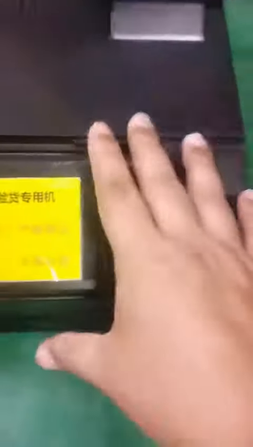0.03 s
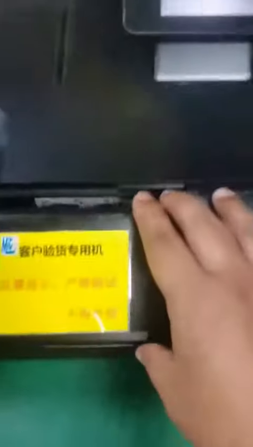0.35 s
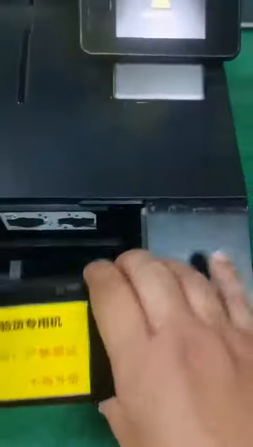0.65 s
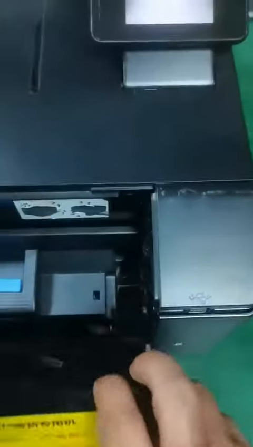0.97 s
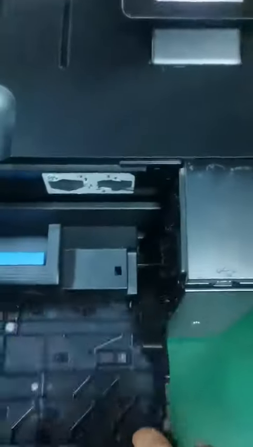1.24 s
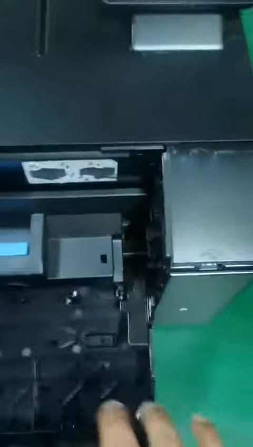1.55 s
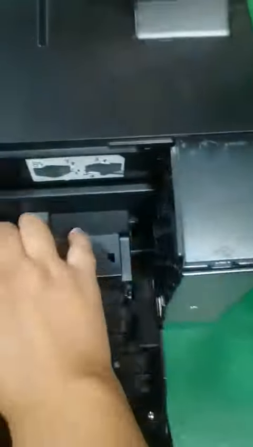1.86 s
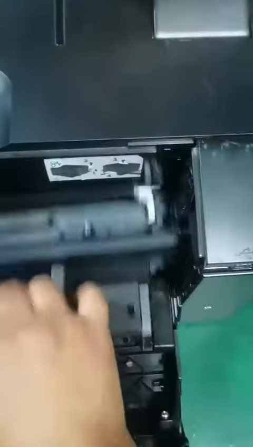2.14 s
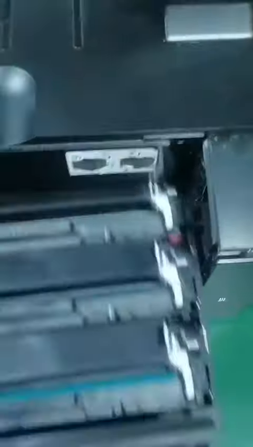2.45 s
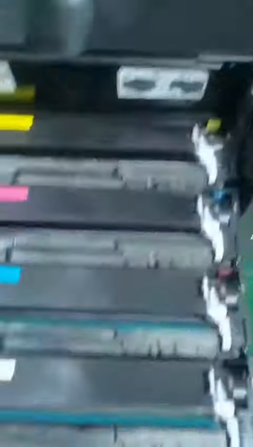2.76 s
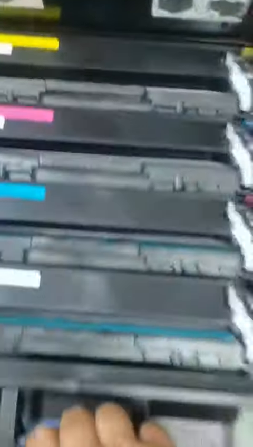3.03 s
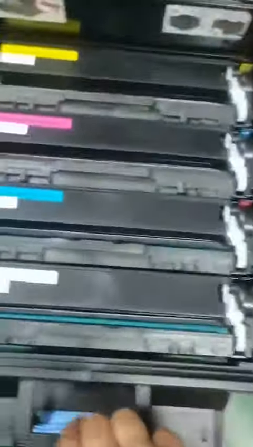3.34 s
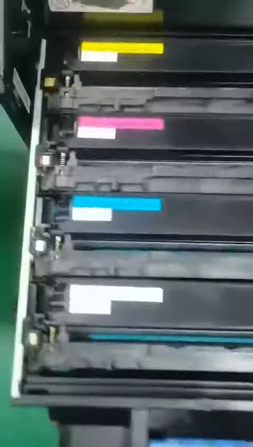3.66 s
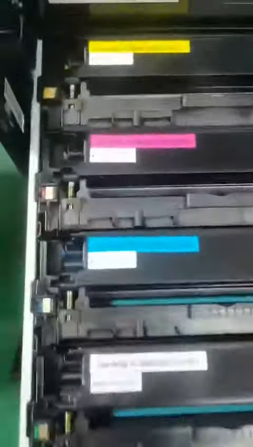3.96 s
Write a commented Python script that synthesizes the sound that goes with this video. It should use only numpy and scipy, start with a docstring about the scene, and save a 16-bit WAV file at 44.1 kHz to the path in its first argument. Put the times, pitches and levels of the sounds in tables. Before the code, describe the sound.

Hollow plastic clunks and clatters come from a printer, close by in a quiet room. After a faint finger rub, the cover knocks open at 0.5 seconds, squeals briefly around 0.8 amid dull microphone bumps, then drops and rattles until 1.7. A catch snaps near 1.9 and the toner drawer bumps along its rails until 2.8. After a lull, the cartridges clatter at 3.4 seconds.

```python
"""A quiet room, close to a printer: a hand swings down the plastic front cover, pulls the toner drawer.
The hinge sticks and slips in a squeal; the cover drops and rattles. The drawer bumps along its rails
and the cartridges clatter at its stop, each knock ringing the hollow housing. Fingers rub, catches
snap, handling thuds reach the microphone. A noise suppressor turns down the tails and the gaps."""
import sys
import numpy as np
from scipy import signal
from scipy.fft import rfft, irfft
from scipy.io import wavfile
from scipy.ndimage import uniform_filter1d, minimum_filter1d

SR = 44100
rng = np.random.default_rng(int(sys.argv[2]) if len(sys.argv) > 2 else 0)


def inscribe(sig):
    """Save sig as 16-bit PCM at rate SR to the path in sys.argv[1].

    A 1-D sig is mono; a 2-D sig holds one channel per row.
    Samples are clipped to [-1, 1] before scaling.
    """
    pcm = np.round(np.clip(np.atleast_2d(sig).T, -1, 1) * 32767)
    wavfile.write(sys.argv[1], SR, pcm.astype(np.int16))


N = 176400
TIME = np.arange(N) / SR


def from_db(db):
    """Decibels to gain."""
    return 10 ** (np.asarray(db) / 20)


def unit_rms(x):
    """Scale to RMS 1."""
    return x / np.sqrt(np.mean(x ** 2) + 1e-20)


def at_hz(points, hz):
    """Spectrum table interpolated in log frequency."""
    points_hz, db = np.transpose(points)
    return np.interp(np.log(hz + 1), np.log(points_hz), db)


def bins_hz(size):
    """FFT bin frequencies."""
    return np.arange(size // 2 + 1) * SR / size


def coloured(x, curve_db):
    """Minimum-phase filter; white noise keeps its power."""
    cepstrum = irfft(np.log(unit_rms(from_db(curve_db))))
    cepstrum[1:len(x) // 2] *= 2
    cepstrum[len(x) // 2 + 1:] = 0
    return irfft(rfft(x) * np.exp(rfft(cepstrum)))


def drift(rate_hz):
    """Smooth random wander, RMS 1."""
    return unit_rms(irfft(rfft(rng.standard_normal(N)) / (1 + (bins_hz(N) / rate_hz) ** 2) ** 2))


def add(out, start_s, x):
    """Mix x in at start_s."""
    i = int(start_s * SR)
    out[i:i + len(x)] += x[:N - i]


def swell(start_s, length_s):
    """Rounded rise and fall."""
    return np.sin(np.pi * np.clip((TIME - start_s) / length_s, 0, 1)).clip(0) ** 0.63


def resonance_db(hz, centre_hz, width_hz, lift_db):
    """Bell curve of one mode."""
    return lift_db / (1 + (2 * (hz - centre_hz) / width_hz) ** 2)


# Air spectrum (frequency [Hz], relative density [dB])
AIR_SPECTRUM = [(120, -3.5), (260, -7), (400, -13.5), (2000, -18), (4000, -25.5), (14000, -40.5)]
# Air envelope (time [s], level [dB])
AIR_ENVELOPE = [(1.3, -70.5), (1.8, -76.5)]


def room_air():
    """Faint, dark room noise."""
    level_db = np.interp(TIME, *np.transpose(AIR_ENVELOPE))
    return from_db(level_db) * coloured(rng.standard_normal(N), at_hz(AIR_SPECTRUM, bins_hz(N)))


# Thud spectrum (frequency [Hz], relative density [dB])
THUD_SPECTRUM = [(20, -10.5), (44, 1.5), (62, -4.5), (170, -3.5), (260, -8.5), (350, -20), (1500, -27.5),
                 (9000, -92)]
# Bumps on the microphone (time [s], length [s], level [dB])
HANDLING_THUDS = [(0.488, 0.027, -31.5), (0.515, 0.2, -45.5), (0.68, 0.048, -34.5), (0.741, 0.12, -35.5),
                  (0.864, 0.054, -26.5), (0.924, 0.046, -27.5), (0.963, 0.021, -23), (0.981, 0.069, -29.5),
                  (1.066, 0.037, -35.5), (1.135, 0.046, -38.5), (2.445, 0.024, -42.5),
                  (2.691, 0.033, -44.5), (2.828, 0.024, -50), (3.018, 0.02, -49), (3.09, 0.038, -47.5),
                  (3.269, 0.03, -50.5), (3.807, 0.074, -36.5), (3.958, 0.041, -39.5)]


def handling_thuds():
    """The hand holding the microphone shifts: dull bumps."""
    force = sum(from_db(db) * swell(start_s, length_s) for start_s, length_s, db in HANDLING_THUDS)
    return force * coloured(rng.standard_normal(N), at_hz(THUD_SPECTRUM, bins_hz(N)))


# Rub spectrum (frequency [Hz], relative density [dB])
RUB_SPECTRUM = [(400, -18), (1600, 5), (2800, -12), (3600, 1), (4700, -22.5), (5700, -15), (6800, -29),
                (8000, -45)]
# Finger strokes (time [s], length [s], level [dB])
FINGER_RUBS = [(0.01, 0.11, -37), (0.451, 0.098, -45)]


def finger_rubs(grain_db=3.5):
    """Fingers drag over the textured cover: grainy hiss."""
    force = sum(from_db(db) * swell(start_s, length_s) for start_s, length_s, db in FINGER_RUBS)
    force *= from_db(grain_db * drift(rate_hz=80))
    return coloured(force * rng.standard_normal(N), at_hz(RUB_SPECTRUM, bins_hz(N)))


# Struck plastic, taps and knocks (frequency [Hz], relative density [dB])
PLASTIC_SPECTRUM = [(30, -31.5), (100, -31.5), (200, -16.5), (330, -19), (500, -5), (700, -0.5), (1000, 0),
                    (1200, -3), (1500, -0.5), (2200, -2.5), (2700, -4), (3200, -15), (4000, -26.5),
                    (5000, -44), (7000, -52.5), (9000, -75.5)]
# Loose parts (time [s], ring [Hz], level [dB])
SETTLING_TAPS = [(1.711, 1335, -34), (1.742, 804, -37.5), (1.846, 1240, -30.5), (2.503, 563, -35.5),
                 (2.563, 882, -43.5)]


def settling_taps(rise_s=0.006, ring_db=21, size=8192):
    """Loose parts settle: dull taps, each around one pitch."""
    out, t, hz = np.zeros(N), np.arange(size) / SR, bins_hz(size)
    for start_s, ring_hz, db in SETTLING_TAPS:
        touch = rng.standard_normal(size) * (t / rise_s) * np.exp(1 - t / rise_s)
        colour_db = at_hz(PLASTIC_SPECTRUM, hz) + resonance_db(hz, ring_hz, ring_hz / 2, ring_db)
        add(out, start_s, from_db(db) * coloured(touch, colour_db))
    return out


# Tick spectrum (frequency [Hz], relative density [dB])
TICK_SPECTRUM = [(1500, -28), (3800, 9.5), (7000, -1), (9000, -22), (14000, -30)]
# Catch snaps (time [s], level [dB])
CATCH_TICKS = [(.521, -36.5), (1.037, -49.5), (1.32, -34.5), (1.875, -19.5), (2.244, -48), (2.675, -42),
               (3.419, -37.5)]


def catch_ticks(decay_s=0.0022, size=4096):
    """Catches snap: short, bright bursts."""
    out, t = np.zeros(N), np.arange(size) / SR
    for start_s, db in CATCH_TICKS:
        burst = rng.standard_normal(size) * np.exp(-t / decay_s)
        add(out, start_s, from_db(db) * coloured(burst, at_hz(TICK_SPECTRUM, bins_hz(size))))
    return out


def stick_slip(wander=0.0033, flutter_db=1.0, rasp_depth=0.29, rasp_hz=454):
    """Plastic sticks and slips, jittering a tone's pitch, amplitude and phase."""
    pitch_ratio = 1 + wander * drift(rate_hz=120)
    flutter = from_db(flutter_db * drift(rate_hz=220))
    rasp = 1 + rasp_depth * (drift(rasp_hz) + 1j * drift(rasp_hz))
    return pitch_ratio, np.sqrt(2) * flutter * np.abs(rasp), np.angle(rasp)


# Short squeaks (time [s], length [s], pitch [Hz], level [dB])
RASPY_SQUEAKS = [(0.017, 0.021, 3440, -45), (0.052, 0.021, 2370, -29.5), (0.117, 0.05, 2070, -41),
                 (0.147, 0.0081, 2020, -50), (0.462, 0.028, 2215, -21), (0.476, 0.048, 2250, -17.5),
                 (1.85, .011, 2090, -22), (2.84, 0.052, 2012, -45), (3.372, 0.02, 2104, -30.5),
                 (3.555, 0.067, 2178, -41.5), (3.657, 0.046, 2122, -51)]


def raspy_squeaks(pitch_ratio, amplitude, slip_rad):
    """Brief, raspy tones: plastic parts rub, and late on a buzz sounds near the latch."""
    out = np.zeros(N)
    rad_per_hz = 2 * np.pi * np.cumsum(pitch_ratio) / SR
    for start_s, length_s, hz, db in RASPY_SQUEAKS:
        out += from_db(db) * swell(start_s, length_s) * np.sin(hz * rad_per_hz + slip_rad)
    return amplitude * out


# Hinge contour (time [s], pitch [Hz], fundamental [dB], 2nd harmonic [dB], 3rd harmonic [dB])
HINGE_SQUEAL = [(0.739, 1018, -52, -21, -78.5), (0.763, 1057, -16.5, -21, -88),
                (0.783, 1110, -25.5, -16, -44.5), (0.8, 1095, -33, -27.5, -54),
                (0.816, 1110, -20, -18, -37.5), (0.831, 1079, -37, -33.5, -43),
                (0.841, 1096, -57, -18.5, -28), (.856, 1089, -36.5, -34, -38.5),
                (.877, 1080, -62, -25, -67.5), (0.894, 1116, -30.5, -47, -103),
                (0.912, 1120, -42, -49, -82)]


def hinge_squeal(pitch_ratio, amplitude, slip_rad, fade_s=0.004):
    """Hinge friction: one wavering squeal of three harmonics."""
    out = np.zeros(N)
    times_s, hz, *harmonics_db = np.transpose(HINGE_SQUEAL)
    phase = 2 * np.pi * np.cumsum(np.interp(TIME, times_s, hz) * pitch_ratio) / SR
    gate = np.clip(np.minimum(TIME - times_s[0], times_s[-1] - TIME) / fade_s, 0, 1)
    for k, db in enumerate(harmonics_db, 1):
        out += from_db(np.interp(TIME, times_s, db)) * np.sin(k * phase + slip_rad)
    return gate * amplitude * out


def panel_modes_db(t, ring_s=0.016, ripple_db=2.5):
    """Close, narrow panel modes ripple the spectrum."""
    response = rng.standard_normal(len(t)) * np.exp(-t / ring_s)
    return ripple_db * unit_rms(rfft(response).real)


def clatter(t, length_s, colour_db, contacts_per_s=350, contact_share=0.28):
    """Loose parts chatter: contacts in noise, sagging over length_s, dulling, then dying."""
    attack_s, sag_db, release_t60_s = 0.00085, 11.5, 0.13
    dulling_s, dull_hz = 0.14, 4270
    size = len(t)
    hits = rng.random(size) < contacts_per_s / SR
    contacts = unit_rms(hits * rng.choice([-1, 1], size) * rng.uniform(0.32, 1, size))
    chatter = np.sqrt(contact_share) * contacts + np.sqrt(1 - contact_share) * rng.standard_normal(size)
    fall_db = -sag_db * np.minimum(t / length_s, 1) - 60 * np.maximum(t - length_s, 0) / release_t60_s
    chatter *= from_db(fall_db) * (1 - np.exp(-t / attack_s))
    bright = np.exp(-t / dulling_s)
    dull_db = colour_db - 10 * np.log10(1 + (bins_hz(size) / dull_hz) ** 8)
    return coloured(chatter * bright, colour_db) + coloured(chatter * (1 - bright), dull_db)


def impact(t, ring_hz, colour_db, contact_s=0.004, ring_weight=1.4):
    """Hard contact: a crack plus the main ring."""
    contact = np.exp(-t / contact_s)
    crack = unit_rms(coloured(rng.standard_normal(len(t)) * contact, colour_db))
    ring = unit_rms(np.sin(2 * np.pi * ring_hz * t) * contact * (1 - contact))
    return unit_rms(crack + ring_weight * ring) * np.sqrt(np.mean(contact ** 2))


# Housing resonances (centre [Hz], width [Hz], lift [dB])
HOUSING_MODES = [(252, 77, 8.5), (382, 51, 5), (480, 92, 3), (843, 21, -4), (1467, 48, 3), (1880, 60, 2),
                 (2214, 240, 3)]


def knocks(table, onset_swell_s=0.0047, onset_swell_db=-10, size=24576):
    """Knocks with a soft onset strike and clatter in the hollow housing."""
    bass_hz, mid_hz, body_hz, treble_hz = 314, 760, 2050, 3700
    strike_db, impact_gain = 4.5, 1.64
    out, t, hz = np.zeros(N), np.arange(size) / SR, bins_hz(size)
    centre_s = size / SR / 2
    housing_db = at_hz(PLASTIC_SPECTRUM, hz) + sum(resonance_db(hz, *mode) for mode in HOUSING_MODES)
    for start_s, db, length_s, impact_db, bass_db, mid_db, treble_db, ring_hz, ring_db in table:
        tone = [(bass_hz / 2, min(bass_db, 0)), (bass_hz, bass_db), (mid_hz, mid_db),
                (body_hz, 0), (treble_hz, treble_db)]
        colour_db = housing_db + at_hz(tone, hz) + panel_modes_db(t)
        colour_db += resonance_db(hz, ring_hz, 0.2 * ring_hz, ring_db)
        strike = clatter(t, length_s, colour_db)
        strike += impact_gain * from_db(impact_db) * impact(t, ring_hz, colour_db)
        onset_swell = rng.standard_normal(size) * np.exp(-np.abs(t - centre_s) / onset_swell_s)
        add(out, start_s - centre_s, from_db(db + onset_swell_db) * coloured(onset_swell, colour_db))
        add(out, start_s, from_db(db + strike_db) * strike)
    return out


# Cover knocks (time [s], base level [dB], clatter length [s], impact trim [dB],
# bass [dB], mid [dB], treble [dB], ring [Hz], ring lift [dB])
COVER_HITS = [ (0.517, -19.5, 0.074, 5.5, -5.5, 11, 8, 874, -0.5),
              (0.600, -17, 0.051, -2.5, -25.5, -11, -6.5, 862, 4.5),
              (0.652, -22, 0.13, -13, -31, -3.5, -4, 1725, 8),
              (1.026, -16, 0.044, -25.5, -56, 9, 0, 1096, 6.5),
              (1.045, -16.5, 0.04, -1.5, -18, 0, -2.5, 1093, 4),
              (1.3175, -19.5, 0.23, 5.5, 0.5, 5.5, 3, 650, 0),
              (1.378, -21.5, 0.096, -1, 10, 0.5, 8, 1720, 3), (1.414, -25, 0.19, 4.5, -6, 9, 7, 880, 3.5),
              (1.463, -20, 0.14, -11.5, -4, 8.5, -3.5, 2030, 8.5),
              (1.496, -22.5, 0.14, 4, -9.5, 2.5, -8, 650, 2.5),
              (1.586, -15.5, 0.032, -4.5, -14.5, 6.5, -10, 1415, 3.5),
              (1.664, -27.5, 0.052, -7, -7, 2, -3, 1640, 6.5)]


def front_cover():
    """The cover swings down, drops and rattles."""
    return knocks(COVER_HITS)


# Drawer and cartridge knocks (columns as COVER_HITS)
DRAWER_HITS = [ (1.875, -21.5, 0.29, 10.5, -5, -6, 1.5, 1399, 2.8),
               (1.915, -25, 0.18, -5.5, -17.5, -16.5, 13, 2555, 15),
               (1.995, -17, 0.092, -6, 6, 3.5, -14, 361, 13),
               (2.111, -17.5, 0.077, -6, -6.5, 1, -16, 410, 4.3),
               (2.140, -18.5, 0.1, -3, 19, 4, -3.5, 249, 3.8),
               (2.243, -16.5, 0.074, -6.5, 11, 9, -4, 407, 7.4),
               (2.392, -17.5, 0.069, -27, 9.5, 6.5, 0, 860, 5.6),
               (2.424, -22.5, 0.034, -8, 18, -1.5, -15, 199.6, 19),
               (2.668, -19.5, 0.099, 9, -3.5, 3.5, 9.5, 1632, 7.9),
               (2.695, -19.5, 0.1, -2.5, -9, 0, -7, 716, 3.45),
               (3.419, -16.5, 0.027, 2, -4.5, 4, 6, 1935, 3.4),
               (3.430, -20, 0.13, 2, -26, -16.5, 4, 2440, 5.6)]


def toner_drawer():
    """The drawer bumps along its rails; cartridges clatter at its stop."""
    return knocks(DRAWER_HITS)


def scene():
    """Impacts, friction and handling, mono."""
    impacts = front_cover() + toner_drawer() + settling_taps() + catch_ticks()
    friction = stick_slip()
    squeaks = raspy_squeaks(*friction) + hinge_squeal(*friction)
    return (impacts + squeaks + finger_rubs() + handling_thuds())[None]


# Suppressor threshold (frequency [Hz], density [dB/Hz])
SUPPRESSOR_THRESHOLD = [(100, -85.5), (400, -70), (1000, -69.5), (2200, -79.5), (3500, -82.5), (5000, -99),
                        (14000, -114)]


def noise_suppressor(x, slope=3, floor_db=-16.5):
    """Turns each band down as its power nears or falls below the threshold."""
    framing = dict(fs=SR, nperseg=512, noverlap=384, scaling="psd")
    hz, _, spectra = signal.stft(x, **framing)
    power = uniform_filter1d(2 * np.abs(spectra) ** 2, size=5, axis=-2)  # across bands
    power = uniform_filter1d(power, size=3, axis=-1).clip(0)  # across frames
    threshold = from_db(at_hz(SUPPRESSOR_THRESHOLD, hz))[:, None] ** 2
    gain = np.maximum((power / (power + threshold)) ** slope, from_db(floor_db))
    return signal.istft(spectra * gain, **framing)[1][..., :N]


def record(dry):
    """Noise suppression, a trace of room air, peak limiter, low-pass."""
    ceiling, cutoff_hz = 0.72, 14000
    x = noise_suppressor(dry) + room_air()
    needed_gain = np.minimum(1, ceiling / (np.abs(x) + 1e-9))
    held_gain = minimum_filter1d(needed_gain, size=161)
    smooth_gain = uniform_filter1d(uniform_filter1d(held_gain, size=81), size=81)
    return signal.sosfilt(signal.cheby2(12, 70, cutoff_hz, fs=SR, output="sos"), x * smooth_gain)


dry = scene()
out = record(dry)
inscribe(out)
```